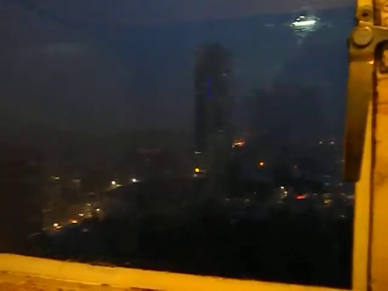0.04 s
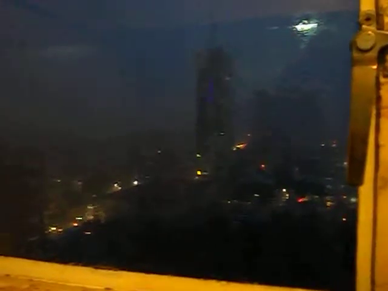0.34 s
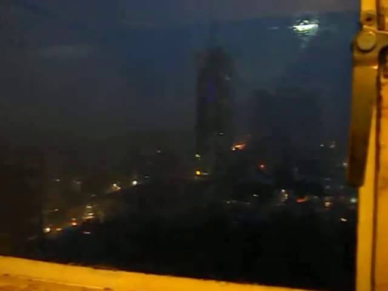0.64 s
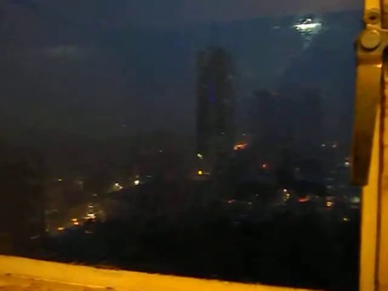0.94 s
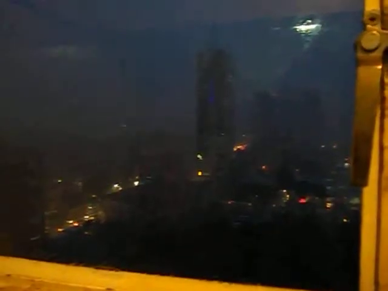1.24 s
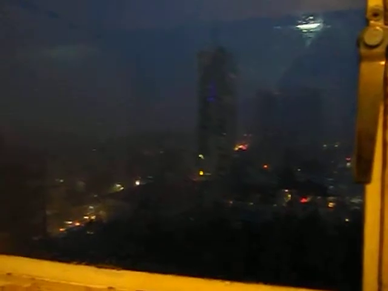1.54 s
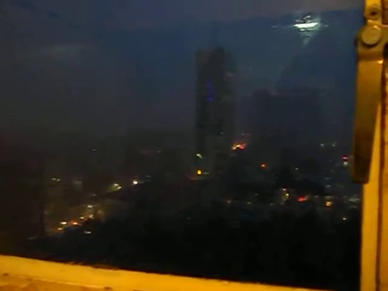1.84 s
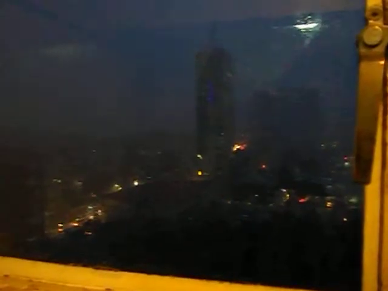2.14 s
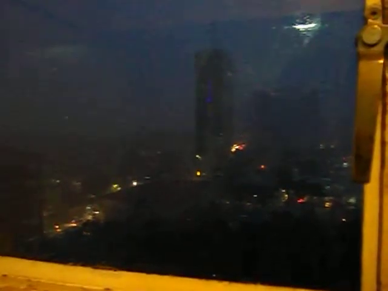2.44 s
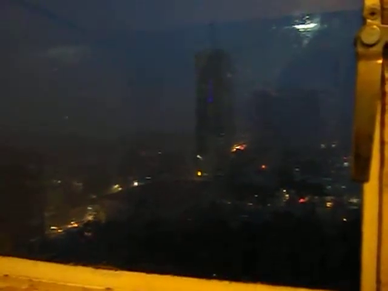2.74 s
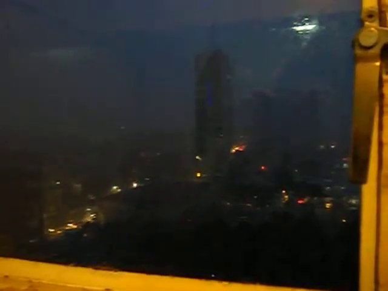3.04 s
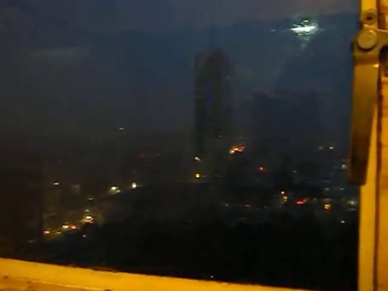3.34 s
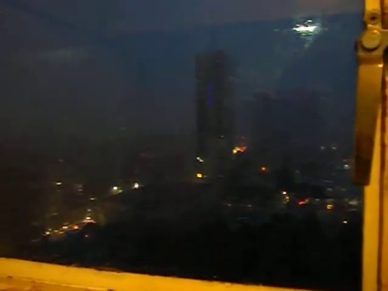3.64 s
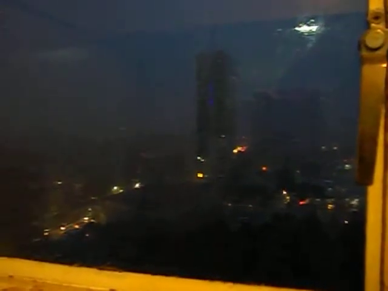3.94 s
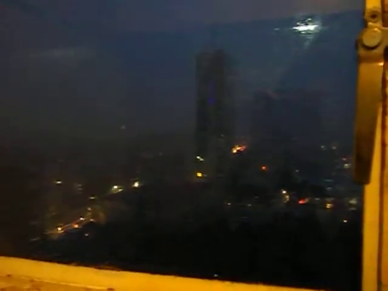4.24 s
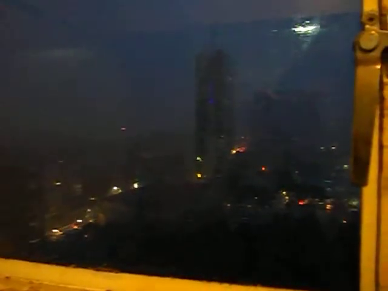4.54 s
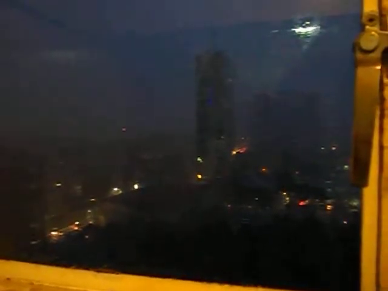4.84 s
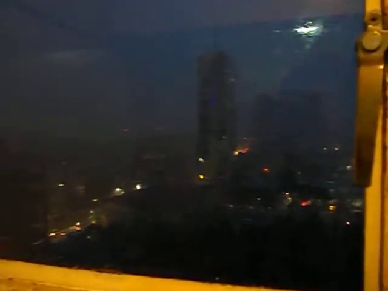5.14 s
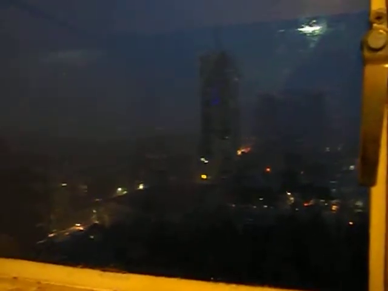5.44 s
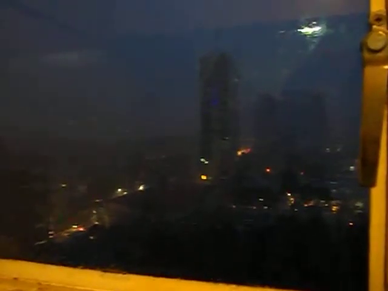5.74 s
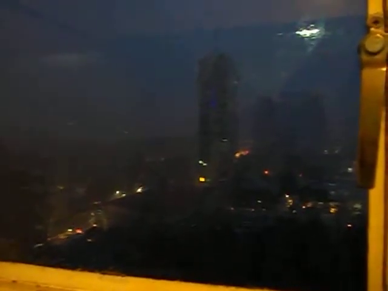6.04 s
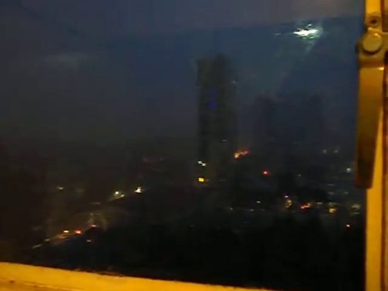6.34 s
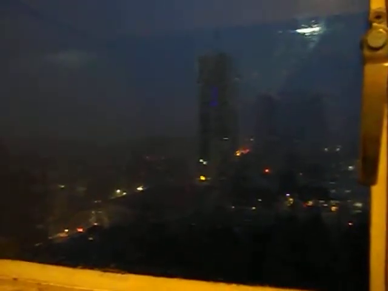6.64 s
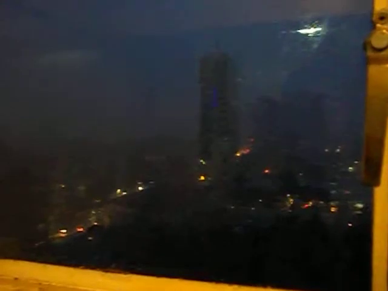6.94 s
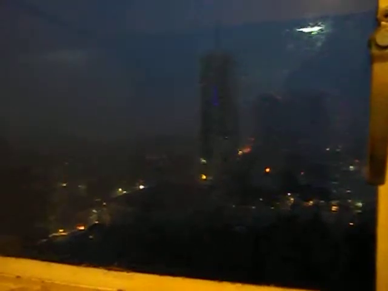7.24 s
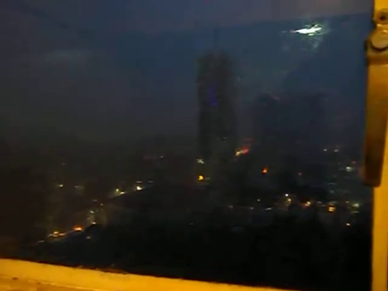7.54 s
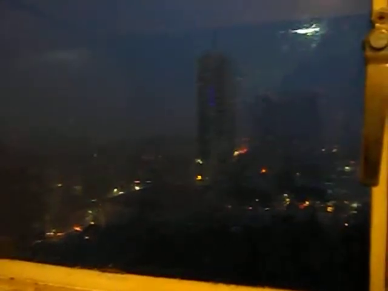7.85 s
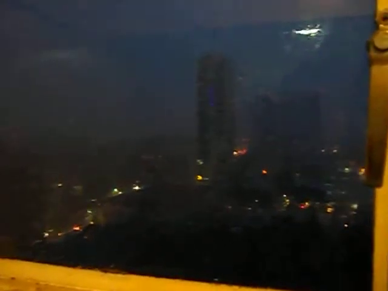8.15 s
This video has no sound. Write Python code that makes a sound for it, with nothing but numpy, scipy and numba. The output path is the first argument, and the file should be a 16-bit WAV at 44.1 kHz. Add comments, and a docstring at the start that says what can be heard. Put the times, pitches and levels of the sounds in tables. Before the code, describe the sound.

Steady rain roars and hisses at an open window above a city, then a sudden squall buffets the microphone with rumbling wind.

```python
"""Rain roars on the roofs far below and hisses on the near wall; one microphone at an open window high
above a city. A breeze rumbles in the opening and spray hits the frame. About four seconds in, a squall
catches the microphone: eddies buffet and slap it, the room's air throbs and the frame whistles briefly.
The recorder's gain control steps down at each hard blast, so the rain ducks and every step ticks.
A faint electronic whine lies under it all."""
import sys
import numpy as np
from scipy import signal
from scipy.fft import rfft, irfft, next_fast_len
from scipy.io import wavfile
from scipy.ndimage import uniform_filter1d, map_coordinates
from numba import njit

SR = 44100
rng = np.random.default_rng(int(sys.argv[2]) if len(sys.argv) > 2 else 0)


def materialize(psi):
    """Save the field psi as 16-bit PCM at rate SR to the path in sys.argv[1].

    A 1-D psi becomes a single channel; in a 2-D psi each row is a channel.
    """
    bounded = np.clip(np.atleast_2d(psi).T, -1, 1)
    quanta = np.round(bounded * 32767).astype(np.int16)
    wavfile.write(sys.argv[1], SR, quanta)


N = 362061

# gusts riding on breeze and squall: crest t/s, half length/s, buffet lift/dB, rush lift/dB
GUSTS = [(0.33, 0.17, 1.5, 4.5), (1.044, 0.16, 6, 5.5), (1.342, 0.1, 5, 3), (3.45, 0.53, 4.5, 5),
         (3.958, 0.034, 0, 6.5), (4.166, 0.13, 9.5, 9), (4.535, 0.17, 3.5, 4), (5.223, 0.13, 5.5, 7),
         (5.397, 0.11, 4.5, 4), (5.767, 0.076, 3, 3.5), (6.123, 0.06, 1.5, 6.5), (6.299, 0.14, 5.5, 1.5),
         (6.686, 0.037, 4.5, -1), (6.88, 0.067, 7, 3.5), (7.33, 0.08, 2, 0.5), (8.17, 0.12, 1, 0)]
# hardest slaps of air on the microphone: t/s, peak level/dB
AIR_SLAPS = [(3.9476, -3.5), (3.9528, -1), (3.9661, 3), (4.0021, 5.5), (4.0065, 5.5), (4.0928, 8),
             (4.1419, 12.5), (4.187, 11), (4.2831, 10), (4.4525, 6), (4.5795, 4.5), (4.8156, -2),
             (4.883, 0.5), (4.9275, 0), (5.1178, 0.5), (5.2375, -0.5), (5.2854, 3.5), (5.2923, 3.5),
             (5.3597, 5.5), (5.4315, 1), (5.4762, 5), (5.6731, -2), (5.719, 0), (5.7724, -3), (5.9775, -4),
             (6.1578, -1), (6.3311, -1.5), (6.4478, -1.5), (6.6605, 0), (6.713, -1)]
# big eddies on the microphone: f/Hz, relative level/dB
BUFFET_SPECTRUM = [(30, -26), (50, -3), (62, -1.5), (110, -1), (160, 0), (195, -8), (250, -8), (300, -14),
                   (400, -22), (800, -80)]
# small eddies in the window opening: f/Hz, relative level/dB
RUSH_SPECTRUM = [(180, -17), (270, -3.5), (340, 1), (410, -4), (500, -5), (620, -8), (760, -8.5),
                 (900, -16), (1250, -17.5), (1900, -26), (2600, -32), (4000, -45), (8000, -79)]
# air modes of the window opening: f/Hz, width/Hz, strength/dB
WINDOW_MODES = [(64.24, 4.9, 4), (108.85, 5.5, 1), (127.9, 9, 3), (149.4, 9, 3), (171.8, 12, 1),
                (236.7, 16.6, 0), (281.4, 12.5, 1), (490, 16, 1), (724.6, 22, 2)]
# deepest air modes of the room: f/Hz, width/Hz, level in the breeze/dB, level at unit squall strength/dB
ROOM_MODES = [(23, 4.7, -37.5, -4), (47, 8, -36.5, -1.5), (88.87, 6, -39, 0.5)]
# single swells of one room mode: crest t/s, half length/s, f/Hz, level/dB
ROOM_SWELLS = [(0.38, 0.25, 47, -27), (1.3, 0.28, 23, -28.5), (4.27, 0.16, 23, -4.5),
               (5.45, 0.19, 47, -8.5)]
# rain on the roofs far below: f/Hz, relative level/dB
ROOF_SPECTRUM = [(60, -16), (200, 6.5), (330, -1), (500, -0.5), (750, 1), (950, -1.5), (1400, -1),
                 (1950, -3), (2350, -8), (2700, -7.5), (3300, -13), (5000, -22), (11000, -50)]
# rain on the near wall: f/Hz, relative level/dB
WALL_SPECTRUM = [(1500, -21), (2800, -12.5), (3400, -5), (4300, 0.5), (5000, 0.5), (5900, 0.5), (6700, -4),
                 (7900, -2), (8800, -7.5), (10000, -9.5), (10600, -9.5), (11000, -16.5), (12200, -10.5)]
# spray flung against the frame: t/s, level/dB, f/Hz, length/s
SPRAY_BURSTS = [(1.68, -46, 7500, 0.034), (1.981, -44, 6940, .06), (2.522, -40, 4800, 0.046),
                (3.062, -37.5, 6270, 0.044), (3.107, -37.5, 4300, .025), (3.203, -35, 4830, 0.032),
                (3.525, -38, 5800, 0.037), (4.804, -37.5, 6000, 0.027), (5.207, -34, 6500, 0.063),
                (6.523, -39, 5500, 0.021), (6.605, -47, 5000, 0.014), (7.068, -41.5, 5000, 0.041),
                (7.517, -40, 5800, .05)]
# tones of the electronics: f/Hz, level/dB
WHINE_TONES = [(10715, -65.5), (10796, -67), (11335, -65)]
# falling treble of the recorder: f/Hz, gain/dB
TREBLE_RESPONSE = [(7000, 0), (10000, -0.5), (11000, -9), (11600, -12.5), (12100, -24)]

FRONT_S = 3.94  # the squall reaches the window


def wind(breeze_buffet_db=-33, breeze_rush_db=-39.5, rush_vs_squall_db=-14.5):
    """Big eddies buffet the microphone, small ones rush in the opening beside it."""
    flow = squall()
    buffet_lift_db = sum(db * bell(s, half) for s, half, db, _ in GUSTS)
    rush_lift_db = sum(db * bell(s, half) for s, half, _, db in GUSTS)
    eddies = through_window(rng.standard_normal(N), BUFFET_SPECTRUM)
    rush = unit(through_window(patchy(depth_db=1.5), RUSH_SPECTRUM))
    buffet_level = np.hypot(amp(breeze_buffet_db), flow) * amp(buffet_lift_db)
    buffet = buffet_level * steadied(eddies, share=0.55, samples=600)
    pressure, puff_db = air_slaps(buffet + room_throb(flow))
    rush_level = np.hypot(amp(breeze_rush_db), amp(rush_vs_squall_db) * flow)
    return pressure + rush_level * amp(rush_lift_db + puff_db + 0.86 * wobble(22)) * rush


def squall(strength_db=-8.5, rise_s=0.018, ease_db_per_s=4):
    """Strength of the squall at the window: the front hits at once, then eases steadily."""
    age = np.maximum(np.arange(N) / SR - FRONT_S, 0)
    return amp(strength_db - ease_db_per_s * age) * (1 - np.exp(-age / rise_s))


def air_slaps(pressure, slap_hz=105):
    """The strongest eddies briefly take over the pressure, each breaking into a puff that lifts the rush."""
    puff_db = np.zeros(N)
    t = np.arange(-SR // 50, SR // 50 + 1) / SR
    for s, db in AIR_SLAPS:
        crest = round(s * SR)
        span = crest + np.arange(len(t)) - len(t) // 2
        share = np.exp(-(t / 0.003) ** 2)
        push = np.sign(pressure[crest]) * amp(db) * np.cos(2 * np.pi * slap_hz * t)
        pressure[span] = (1 - share) * pressure[span] + share * push
        puff_db[span] += 3 * np.exp(-(t / 0.0042) ** 2)
    return pressure, puff_db


def room_throb(flow, db_per_squall_db=1.25):
    """Wind across the opening pumps the room's deepest air modes; now and then one swells by itself."""
    throb, t = np.zeros(N), np.arange(N) / SR
    for hz, width, breeze_db, squall_db in ROOM_MODES:
        level = np.hypot(amp(breeze_db), amp(squall_db) * flow ** db_per_squall_db)
        throb += level * steadied(ringing(hz, width), share=0.9, samples=5000)
    for s, half, hz, db in ROOM_SWELLS:
        throb += amp(db) * bell(s, half) * np.sin(2 * np.pi * hz * t)
    return throb


def frame_whistle():
    """The hardest gust draws a short, breathy edge tone from the frame."""
    return amp(-28) * bell(4.14, half_length_s=0.16) * ringing(centre_hz=1200, width_hz=60)


def rain(roar_db=-34.5, hiss_db=-41.5, hiss_growth_db=1.93):
    """Far rain on the roofs merges into a roar; on the near wall it keeps a fine patter in its hiss."""
    roar = unit(through_window(patchy(depth_db=0.5), ROOF_SPECTRUM))
    patter = patchy(depth_db=0.94) + amp(-8.5) * drops(per_s=1600, spread_db=3.0)
    hiss = unit(filtered(patter, lambda hz: colour(WALL_SPECTRUM, hz)))
    approach = np.minimum(np.arange(N) / SR / FRONT_S, 1)  # the hiss grows as the squall nears
    roar_level = amp(roar_db + 0.33 * wobble(8.9))
    hiss_level = amp(hiss_db + hiss_growth_db * approach + 0.6 * wobble(3.32) + 0.32 * wobble(21))
    return roar_level * roar + hiss_level * hiss


def drops(per_s, spread_db):
    """Raindrops land at random moments: many small, a few large."""
    landed = rng.random(N) < per_s / SR
    polarity = rng.choice([-1, 1], N)
    size = amp(spread_db * np.minimum(rng.exponential(size=N), 4))
    return unit(landed * polarity * size)


def spray(spread_db=6.6):
    """Each sheet of spray on the frame is a dense burst of droplets that swells fast and dies away."""
    out, t = np.zeros(N), np.arange(SR // 3) / SR
    for s, db, hz, length in SPRAY_BURSTS:
        band = signal.butter(2, [hz * 0.63, hz * 1.34], "bandpass", fs=SR, output="sos")
        impacts = rng.standard_normal(len(t)) * amp(spread_db * rng.standard_normal(len(t)))
        droplets = unit(signal.sosfilt(band, impacts))
        age = 3 * t / length
        out[round(s * SR):][:len(t)] += amp(db) * droplets * age * np.exp(1 - age)
    return out


def whine():
    """Thin steady tones of the electronics, far under the weather."""
    t = np.arange(N) / SR
    return sum(amp(db) * np.sin(2 * np.pi * hz * t) for hz, db in WHINE_TONES)


def through_window(noise, spectrum):
    """Noise shaped to a spectrum, with narrow bands lifted by the air modes of the opening."""
    def response(hz):
        modes = sum((amp(db) * resonance(hz, centre, width)) ** 2 for centre, width, db in WINDOW_MODES)
        return colour(spectrum, hz) * np.sqrt(1 + modes)
    return filtered(noise, response)


def resonance(hz, centre_hz, width_hz):
    """Gain of one resonant peak of height 1."""
    return 1 / (1 + (2 * (hz - centre_hz) / width_hz) ** 2)


def ringing(centre_hz, width_hz):
    """Noise of rms 1 in one narrow resonance."""
    return unit(filtered(rng.standard_normal(N), lambda hz: resonance(hz, centre_hz, width_hz)))


def patchy(depth_db):
    """White noise with patches of random gain drifting over time and frequency."""
    spectra = signal.stft(rng.standard_normal(N), nperseg=512)[2]
    patches = uniform_filter1d(rng.standard_normal(spectra.shape), size=7, axis=0)
    patches = unit(uniform_filter1d(patches, size=14, axis=1))
    return unit(signal.istft(spectra * amp(depth_db * patches), nperseg=512)[1][:N])


def steadied(noise, share, samples):
    """Noise of rms 1 with a share of its chance swells evened out."""
    power = uniform_filter1d(uniform_filter1d(noise ** 2, samples), samples)
    envelope = np.sqrt(np.abs(power) + 1e-20)
    return unit(noise / envelope ** share)


def bell(crest_s, half_length_s):
    """A smooth rise and fall of height 1."""
    return np.exp(-((np.arange(N) / SR - crest_s) / half_length_s) ** 2)


def wobble(knots_per_s):
    """A smooth random curve."""
    knots = rng.standard_normal(int(N * knots_per_s / SR) + 4)
    return map_coordinates(knots, [np.arange(N) * knots_per_s / SR])


def filtered(x, response):
    """x with its spectrum multiplied by response(hz)."""
    size = next_fast_len(N + SR // 2)
    return irfft(rfft(x, size) * response(np.fft.rfftfreq(size, 1 / SR)), size)[:N]


def colour(points, hz):
    """Gain between (f/Hz, level/dB) points on a log frequency axis."""
    f, db = np.transpose(points)
    return amp(np.interp(np.log(hz + 1), np.log(f + 1), db))


def amp(db):
    """Decibels to gain."""
    return 10 ** (np.asarray(db) / 20)


def unit(x):
    """Scaled to rms 1."""
    return x / np.sqrt(np.mean(x ** 2) + 1e-20)


@njit
def gain_control(x, limit, step, recovery, lag):
    """A swing over the limit cuts the gain one step, lag samples after its crest; it creeps back to 1."""
    gain, now, wait, crest = np.ones(len(x)), 1.0, 0, 0.0
    for i in range(len(x)):
        if abs(x[i]) * now > max(limit, crest):
            crest, wait = abs(x[i]) * now, lag
        elif wait > 0:
            wait -= 1
            if wait == 0:
                now, crest = now * step, 0.0
        now = min(1.0, now * recovery)
        gain[i] = now
    return gain


def scene():
    """Rain, spray and wind at one microphone in the open window, over a faint whine."""
    return (rain() + spray() + wind() + frame_whistle() + whine())[None]


def record(dry):
    """The recorder ducks in steps, clips at a hard ceiling and rolls off the treble."""
    step_db, lag_s, recovery_db_per_s = -3.4, 0.0006, 43
    ceiling, top_hz = 0.71, 12100
    gain = gain_control(dry[0], limit=0.55, step=float(amp(step_db)),
                        recovery=float(amp(recovery_db_per_s / SR)), lag=round(lag_s * SR))
    clipped = np.clip(dry[0] * gain, -ceiling, ceiling)
    return filtered(clipped, lambda hz: colour(TREBLE_RESPONSE, hz) * (hz < top_hz))[None]


dry = scene()
out = record(dry)
materialize(out)
```